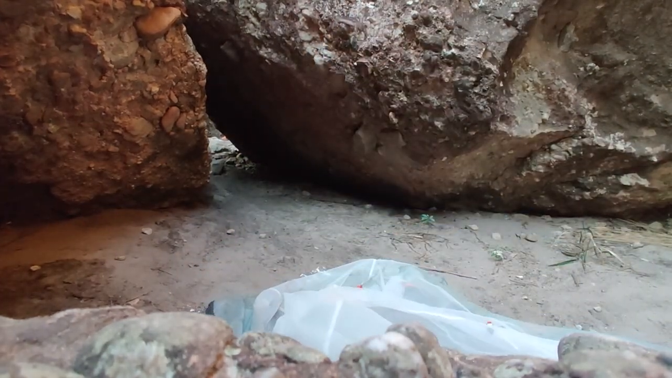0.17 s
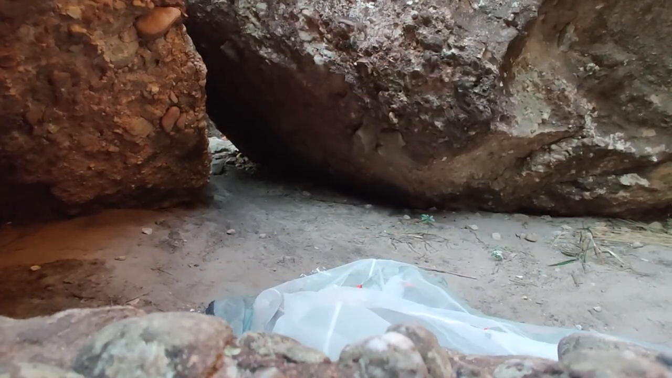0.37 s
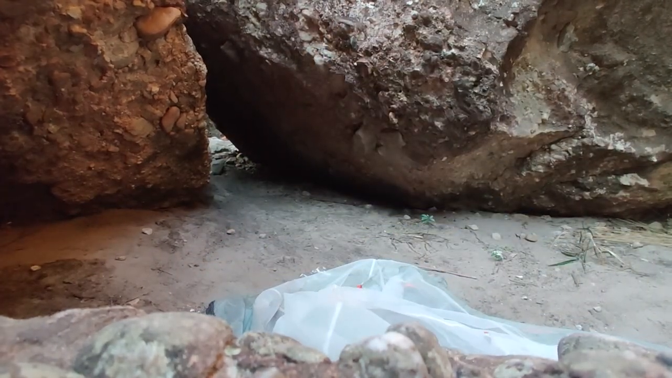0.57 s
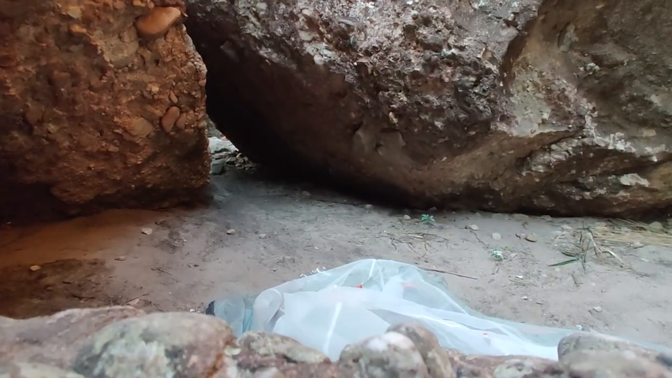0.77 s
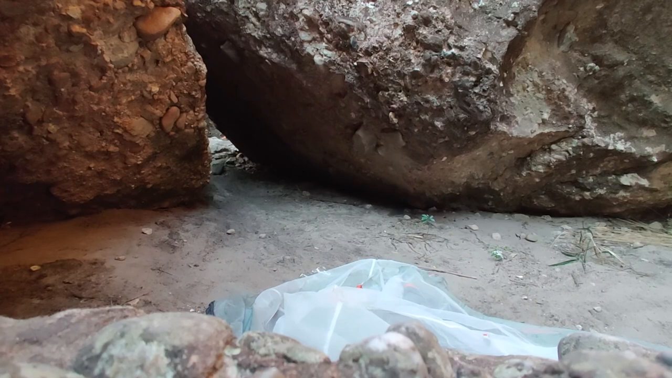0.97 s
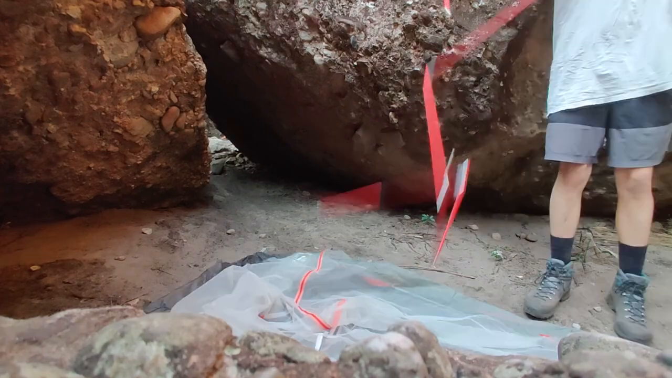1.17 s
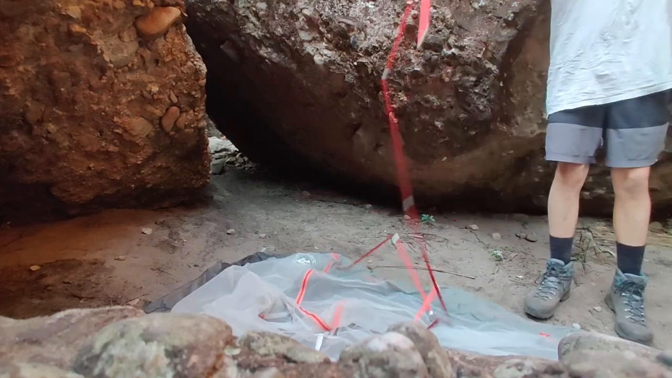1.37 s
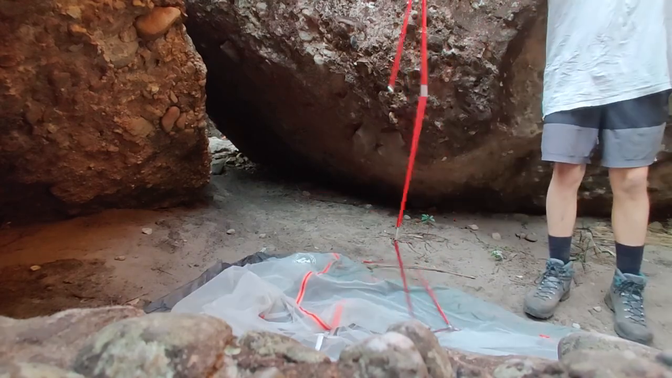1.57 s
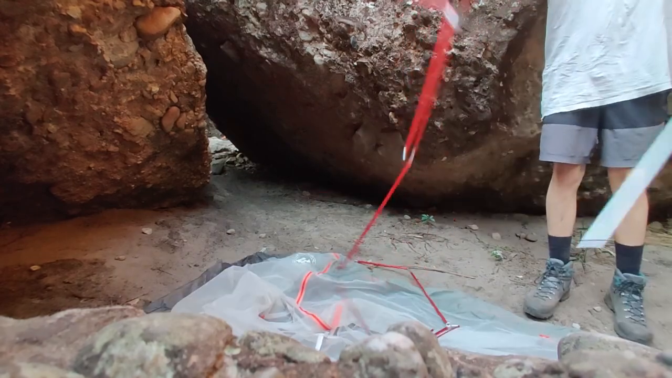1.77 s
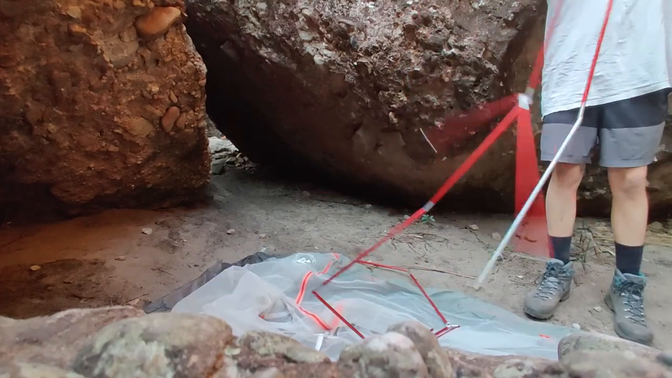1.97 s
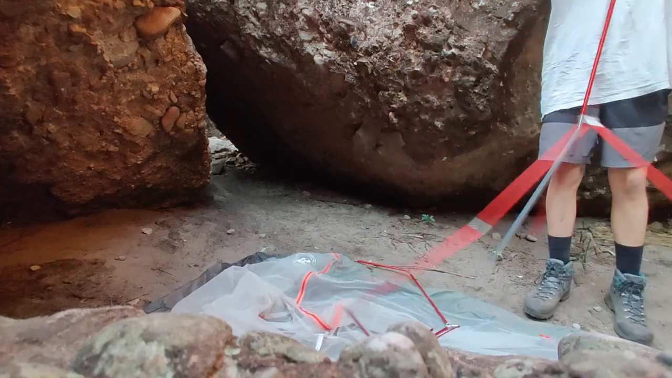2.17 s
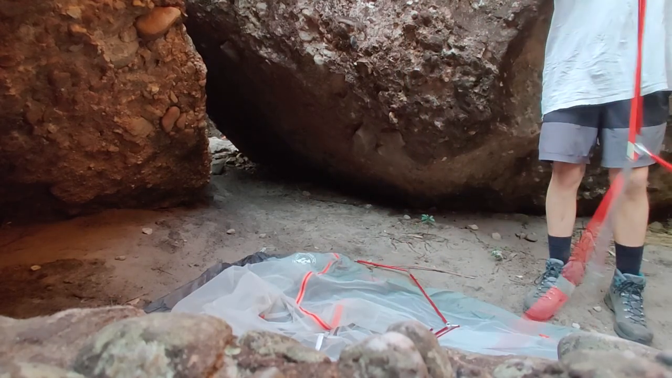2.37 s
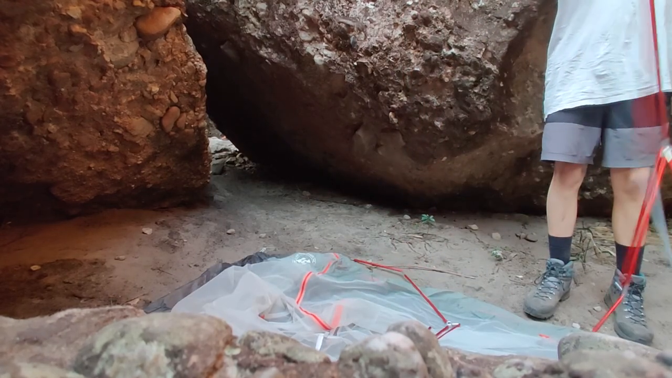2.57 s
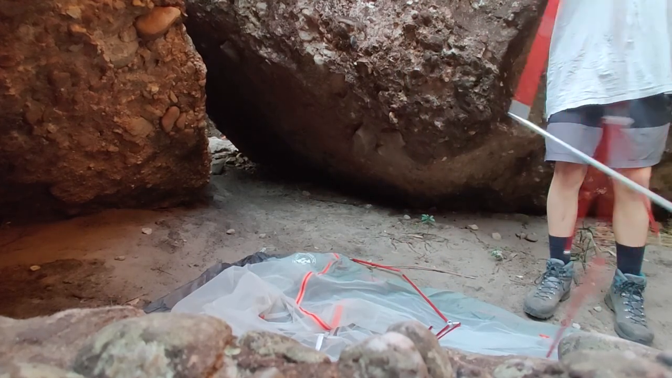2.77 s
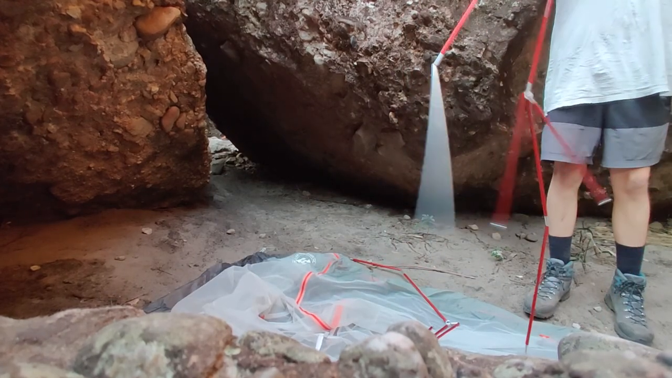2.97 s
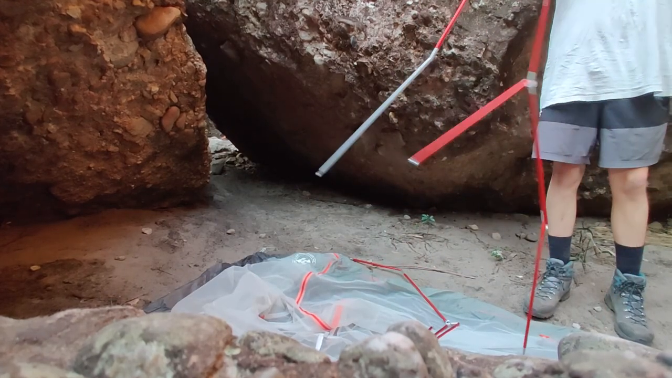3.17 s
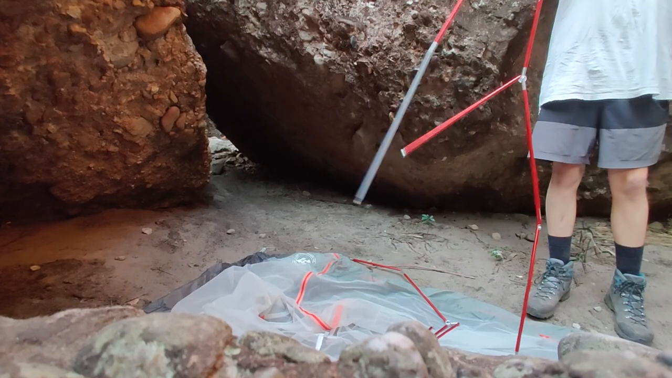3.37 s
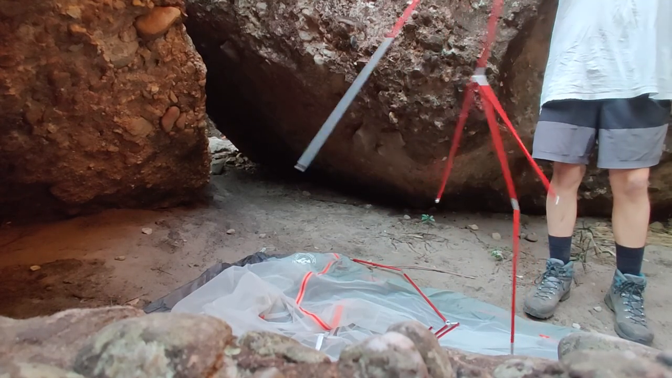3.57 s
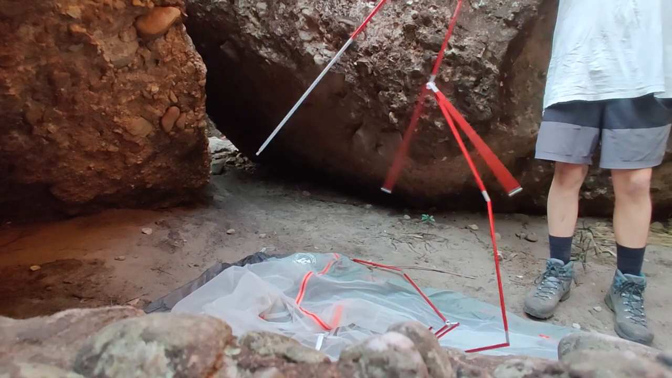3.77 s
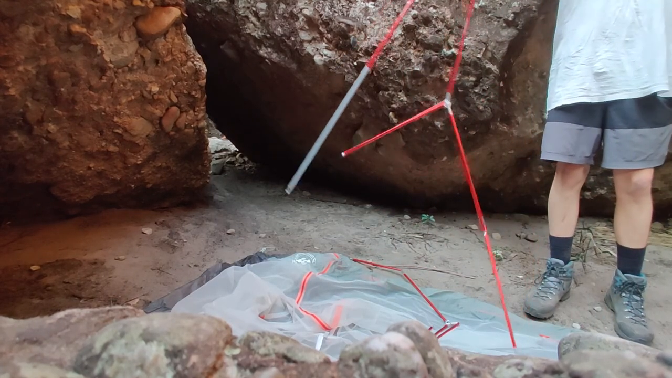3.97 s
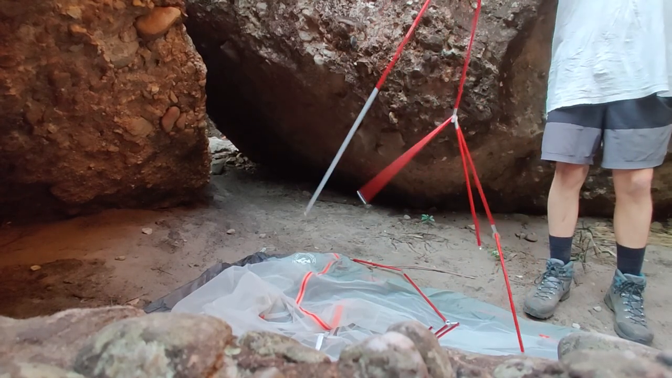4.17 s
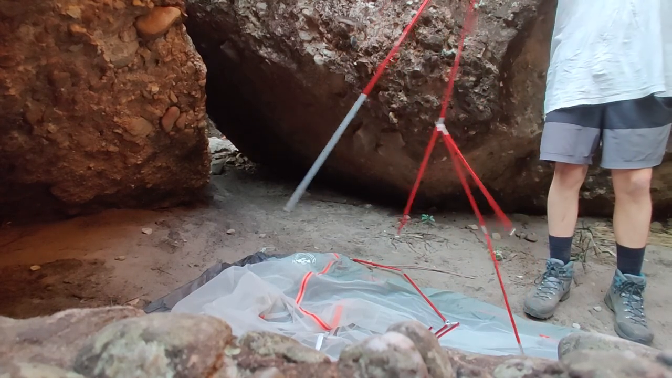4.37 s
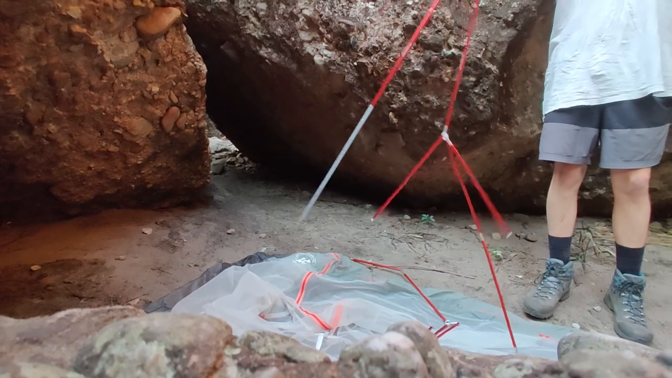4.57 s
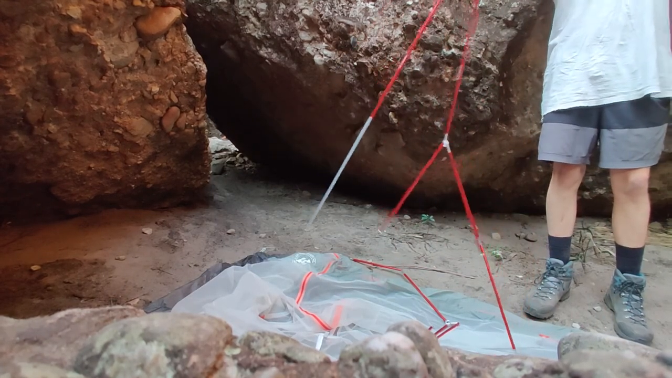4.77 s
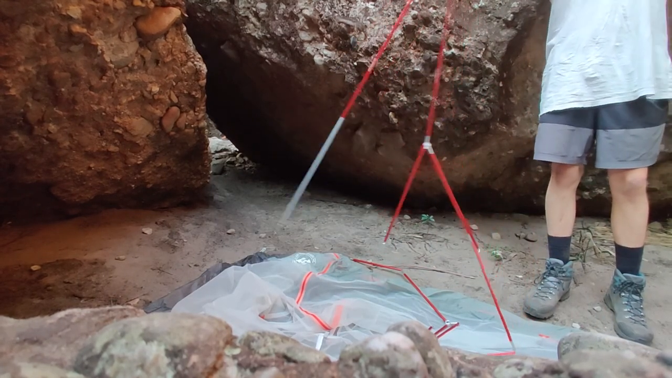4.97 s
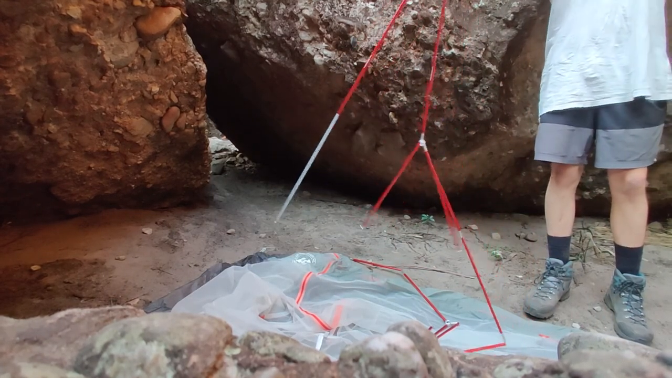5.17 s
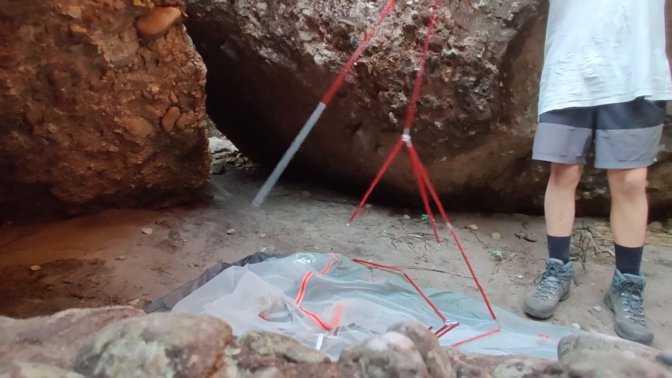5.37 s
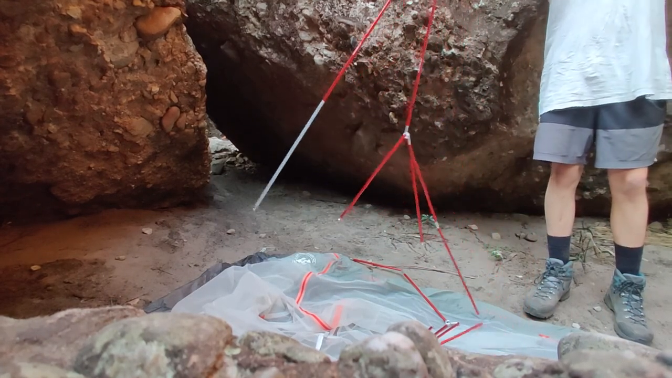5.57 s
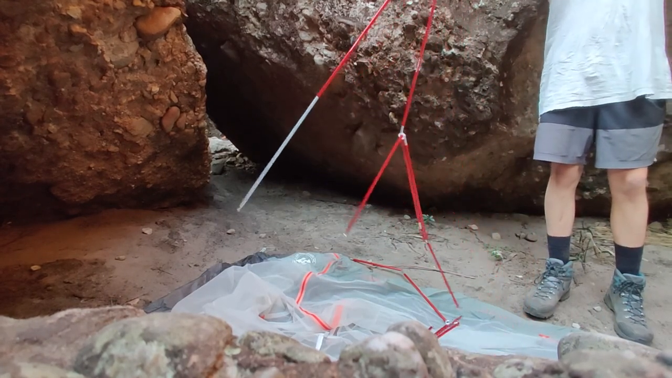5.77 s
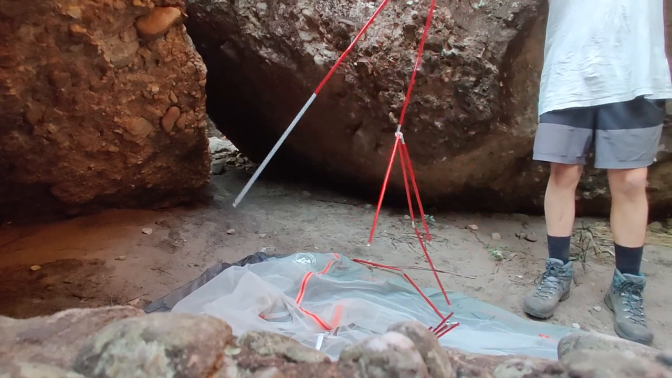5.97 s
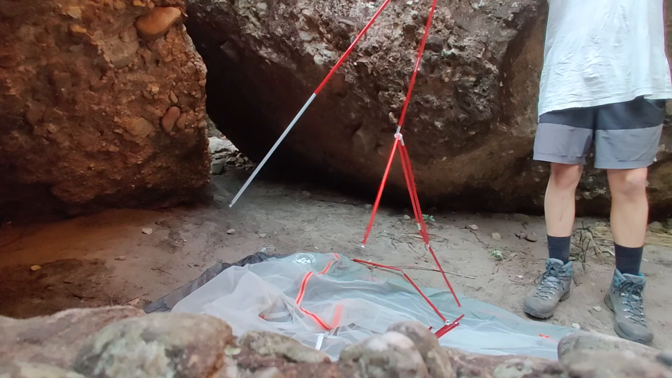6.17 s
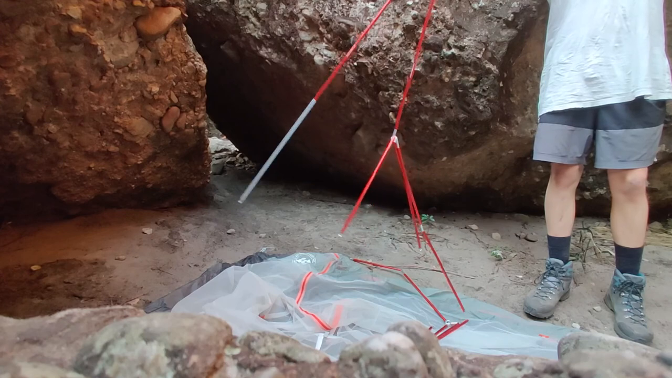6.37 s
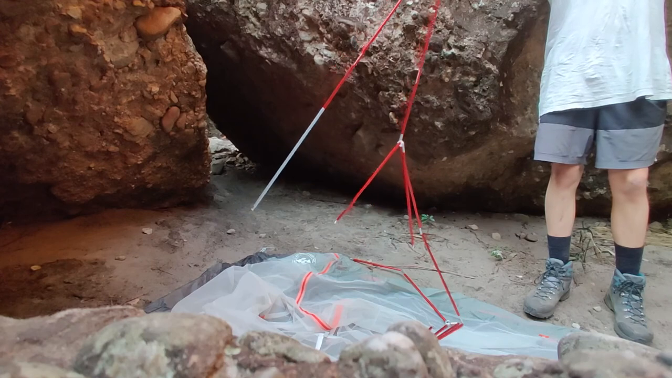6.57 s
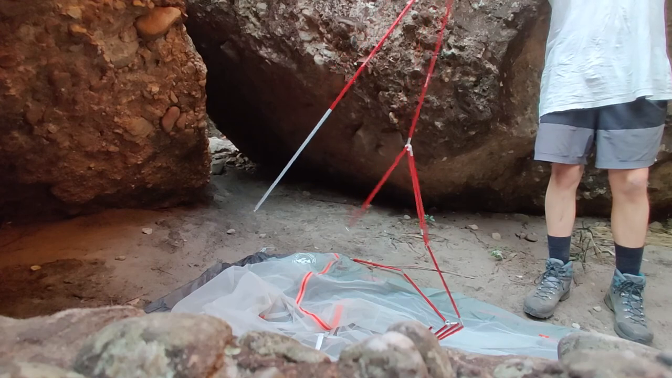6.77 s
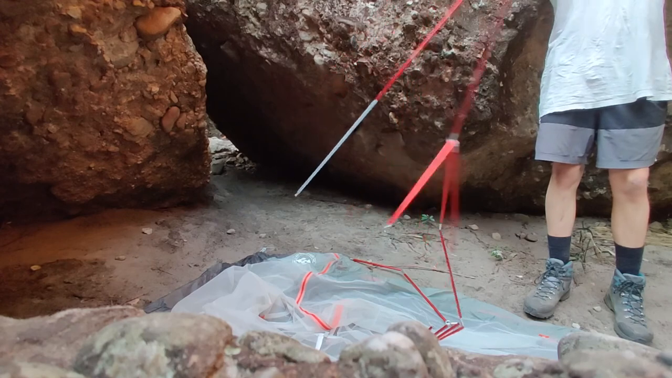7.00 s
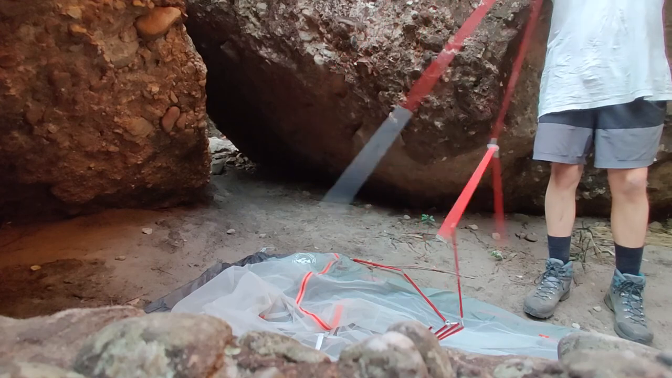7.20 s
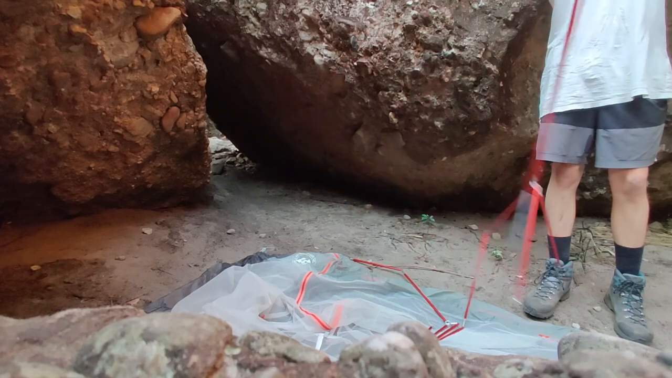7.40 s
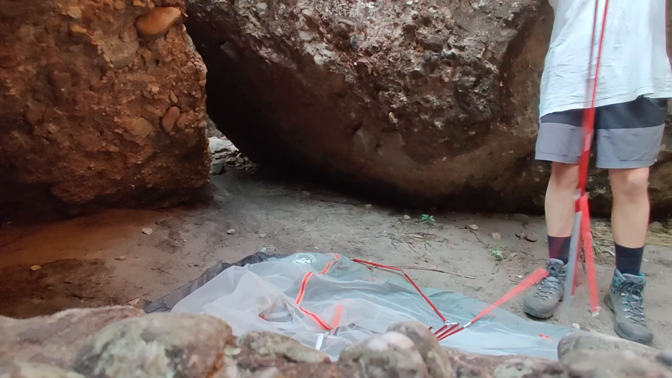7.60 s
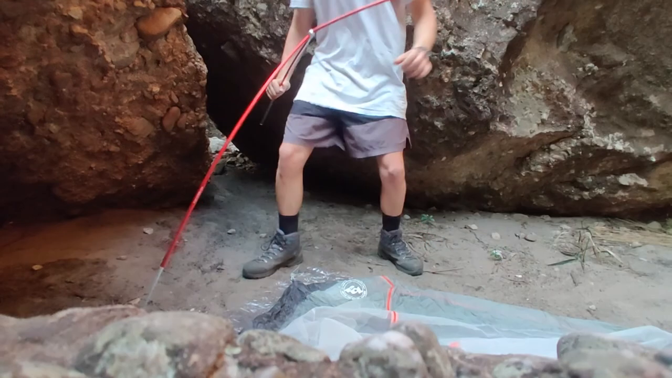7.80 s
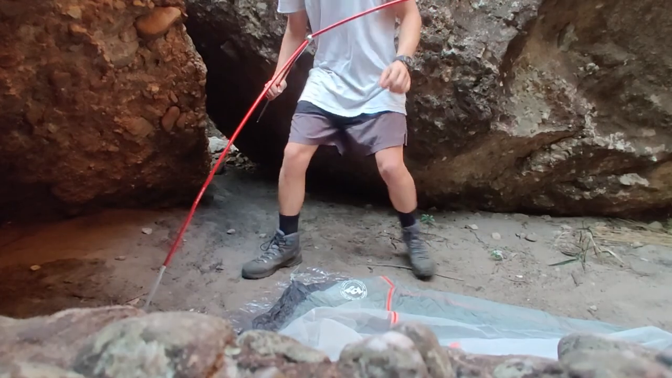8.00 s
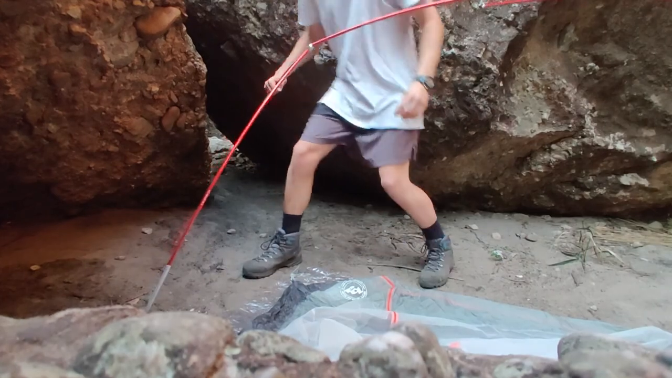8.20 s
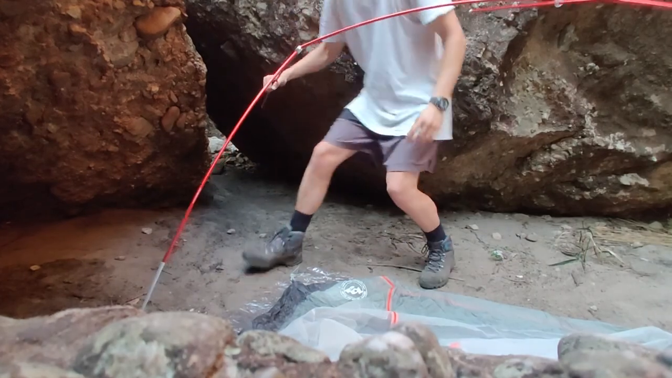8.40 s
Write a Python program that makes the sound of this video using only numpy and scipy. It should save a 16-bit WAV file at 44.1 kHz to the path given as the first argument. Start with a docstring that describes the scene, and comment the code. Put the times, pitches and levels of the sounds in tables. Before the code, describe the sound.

Hollow aluminium tent pole sections chatter and clack together in a rapid burst, then snap sporadically amid faint nylon rustle and a quiet scuff on sand.

```python
"""A shock-corded aluminium tent pole is shaken out under a rock overhang: chattering joints excite tube resonances.
A windy shot opens, with shaped noise and gusts rumbling at the microphones, then a cut to a quieter one.
Nylon rustles and flaps, and the cord sizzles, as noise under swelling, grainy envelopes; the rock adds a diffuse echo.
Short filtered scrapes follow, and shoes scuff on sand at the end with bass thuds and gritty noise."""
import sys
import numpy as np
from scipy import signal
from scipy.fft import rfft, irfft
from scipy.io import wavfile

SR = 44100
rng = np.random.default_rng(int(sys.argv[2]) if len(sys.argv) > 2 else 0)


def wrap_up_sound(samples):
    """Save the sound to the file named by the first command line argument, as 16-bit audio."""
    columns = np.atleast_2d(samples).T
    # keep every value between -1 and 1, then stretch to whole-number steps
    tamed = np.clip(columns, -1, 1)
    steps = np.round(tamed * 32767).astype(np.int16)
    wavfile.write(sys.argv[1], SR, steps)


N = 372204
TIME = np.arange(N) / SR


def amp(db):
    """Decibels to gain."""
    return 10 ** (np.asarray(db) / 20)


def read(points, hz):
    """Reads a curve of values over frequency, interpolated on a log-frequency axis."""
    f, value = np.transpose(points)
    return np.interp(np.log(hz + 1), np.log(np.abs(f) + 1), value)


def level(points):
    """Turns a curve of level over time into a gain for every sample."""
    return amp(np.interp(TIME, *np.transpose(points)))


def unit(x):
    """Scales a stereo sound to a mean energy of one a channel."""
    return x / np.sqrt(np.sum(x ** 2) / 2 + 1e-20)


def add(mix, s, sound):
    """Mixes a sound in at time s, in seconds."""
    part = mix[:, max(round(s * SR), 0):][:, :sound.shape[1]]
    part += sound[:, :part.shape[1]]


# Likeness of the two microphones in diffuse sound: f/Hz, left-right correlation [0 to 1]
LIKENESS = [(30, 0.17), (120, 0.98), (300, 0.6), (700, 0.25), (1500, 0.14), (15000, 0.063)]


def diffuse(size):
    """White noise from all around: the microphones agree most in the bass and little in the treble."""
    left, other = rfft(rng.standard_normal((2, size)))
    alike = np.clip(read(LIKENESS, np.fft.rfftfreq(size, 1 / SR)), -1, 1)
    right = alike * left + np.sqrt(1 - alike ** 2) * other
    return irfft(np.array([left, right]), size)


def noise(spectrum):
    """Steady coloured stereo noise of rms one."""
    gain = amp(read(spectrum, np.fft.rfftfreq(N, 1 / SR)))
    return np.sqrt(N) * unit(irfft(rfft(diffuse(N)) * gain, N))


def swells(rows):
    """Summed envelope of blows with exponential rise and fall: t/s, peak level/dB, rise/s, fall/s."""
    t = TIME[::16]
    shape = 0
    for s, db, rise, fall in rows:
        shape = shape + amp(db) * np.exp(-np.maximum((s - t) / rise, (t - s) / fall))
    return np.interp(TIME, t, shape)


def puffs(rows, spectrum):
    """Soft blows of coloured noise that swell and die without ringing."""
    return swells(rows) * noise(spectrum)


def grain(per_s, spread_db, fade):
    """Envelope of many small slips of uneven size, each decaying in power over fade seconds; rms one."""
    size = amp(2 * abs(spread_db) * np.minimum(rng.exponential(1, N), 3))
    slips = (rng.random(N) < per_s / SR) * size
    power = signal.lfilter([1], [1, -np.exp(-1 / (fade * SR))], slips)
    return np.sqrt(power / power.mean())


def bell(hz, centre, width):
    """Power response of one resonance, top one."""
    return 1 / (1 + (2 * (hz - centre) / width) ** 2)


def causal(db):
    """Minimum-phase response of a dB curve: nothing sounds before the blow."""
    cepstrum = irfft(np.log(amp(db)))
    half = cepstrum.shape[-1] // 2
    cepstrum[..., 1:half] *= 2
    cepstrum[..., half + 1:] = 0
    return np.exp(rfft(cepstrum))


def low_note(hz, db, t60, rise=0.0025):
    """One damped bass mode, alike at both microphones."""
    t = np.arange(SR // 2) / SR
    decay = amp(db - 60 * t / t60)
    return np.tile(decay * (1 - np.exp(-t / rise)) * np.sin(2 * np.pi * hz * t), (2, 1))


# Colour of still air: f/Hz, relative level/dB
AIR_COLOUR = [(12, -32), (20, 2), (130, -20), (158, -15), (233, -19.5), (292, -16.5), (355, -22),
              (408, -20), (510, -24.5), (603, -22.5), (1390, -31.5), (1690, -32.5), (8790, -38),
              (13400, -33), (15800, -36.5)]
# Colour of the breeze: f/Hz, relative level/dB
BREEZE_COLOUR = [(18, -36), (30, -16), (71, -5), (202, -6.5), (243, -9), (277, -6.5), (673, -12),
                 (728, -12), (1330, -21), (4190, -26), (7260, -30), (8500, -33), (15500, -32)]
# Colour of the wind buffeting the microphones: f/Hz, relative level/dB
BUFFET_COLOUR = [(15, -4), (50, -5), (75, -17), (130, -21.5), (250, -51), (600, -59), (2000, -81)]
# Gusts on the microphones, before the left-right balance: t/s, peak level/dB, rise/s, fall/s
WIND_GUSTS = [(.85, -28.5, 0.0092, 0.014), (.963, -21, 0.0098, 0.017), (1.035, -22.5, 0.013, 0.0051),
              (1.11, -43, 0.011, .01)]
AIR_DB, CUT_S = -61, 1.123
# Between gusts the buffeting builds steadily until the cut (dB before the left-right balance)
BUFFET_START_DB, BUFFET_DB_PER_S = -59.5, 13.5


def outdoors(breeze_db=-50):
    """Still air throughout; a breeze buffets the microphones in the windy shot, until the cut."""
    windy_shot = np.clip((CUT_S - TIME) / 0.008, 0, 1)
    build = amp(BUFFET_START_DB + BUFFET_DB_PER_S * np.minimum(TIME, CUT_S))
    balance = amp([[-11], [3]])  # left, right
    buffets = (build + swells(WIND_GUSTS)) * noise(BUFFET_COLOUR) * balance
    still_air = amp(AIR_DB) * noise(AIR_COLOUR)
    return still_air + windy_shot * (amp(breeze_db) * noise(BREEZE_COLOUR) + buffets)


# Steady rubbing of fabric as the camper works, before its grain: t/s, level/dB
RUBBING_LEVEL = [(0, -50), (.45, -58), (1.15, -58.5), (1.45, -50.5), (1.9, -51.5), (2.35, -57.5),
                 (2.6, -53.5), (2.8, -64), (3.45, -67), (3.8, -68), (5.4, -70), (6.55, -72), (7.17, -63.5),
                 (7.42, -72.5), (7.6, -63), (8.1, -68), (8.44, -59)]
# Colour of rubbing nylon: f/Hz, relative level/dB
NYLON_COLOUR = [(200, -4.5), (1500, -2.5), (3000, -1.5), (4800, 1), (7300, -1), (8500, -7.5), (10500, -1),
                (12500, -18.5), (16000, -4.5)]
# Brief swishes of nylon, before their grain: t/s, peak level/dB, rise/s, fall/s
NYLON_SWISHES = [(.58, -43.5, 0.061, 0.052)]
# Thin sizzle of the sliding cord: f/Hz, relative level/dB
CORD_COLOUR = [(9000, -29), (13800, -14), (14800, -3), (15500, -3.5), (16100, -17)]
# Pulls of the cord through the tubes, before grain and balance: t/s, peak level/dB, rise/s, fall/s
CORD_PULLS = [(2.6, -45.5, .04, 0.041), (3.18, -58.5, 0.019, .03), (3.535, -50, .018, .02),
              (4.98, -64.5, .05, .1), (7.03, -61, .12, .09)]
# A short rub starts just before each clack and fades after it (dB over the clack's table level)
RUB_LEAD_S, RUB_DB, RUB_RISE_S, RUB_FALL_S = 0.0081, -61, .014, 0.059
# The cord draws back at every clack (dB over the clack's table level)
RECOIL_DB, RECOIL_RISE_S, RECOIL_FALL_S = -69.5, .01, .09


def rubbing():
    """Nylon rustles and joints rub around each clack while the elastic cord slides in small slips."""
    joint_rubs = [(s - RUB_LEAD_S, db + RUB_DB, RUB_RISE_S, RUB_FALL_S) for s, db, *_ in POLE_CLACKS]
    recoils = [(s, db + RECOIL_DB, RECOIL_RISE_S, RECOIL_FALL_S) for s, db, *_ in POLE_CLACKS]
    rub_level = np.hypot(level(RUBBING_LEVEL), swells(NYLON_SWISHES + joint_rubs))
    rubs = rub_level * noise(NYLON_COLOUR) * grain(per_s=330, spread_db=1.0, fade=0.0086)
    cord = swells(CORD_PULLS + recoils) * noise(CORD_COLOUR) * grain(per_s=140, spread_db=6.5, fade=.008)
    return rubs + cord * amp([[-7], [2]])  # left, right


# Colour of the rock's late echo: f/Hz, relative level/dB
ROCK_COLOUR = [(200, -0.5), (1500, -0.5), (4000, -1), (7500, -6.5), (9000, -7), (15000, -18)]
# Decay of the rock's late echo: f/Hz, t60/s
ROCK_DECAY = [(200, 0.62), (2000, .48), (7000, 0.42), (15000, 0.4)]


def rock(x, wet_db=-21, build=0.008, wall=0.084, wall_db=-3):
    """A faint diffuse tail from the boulders, with one soft slap from a farther wall."""
    hz, t, z = signal.stft(diffuse(size=32768), SR, nperseg=256)
    slap = amp(wall_db) * np.exp(-((t - wall) / 0.027) ** 2)
    swell = 1 - np.exp(-(t / build) ** 2) + slap
    decay_db = -60 * t / read(ROCK_DECAY, hz)[:, None]
    z = z * swell * amp(read(ROCK_COLOUR, hz)[:, None] + decay_db)
    echo = unit(signal.istft(z, SR, nperseg=256)[1])
    return amp(wet_db) * signal.fftconvolve(x, echo, axes=1)[:, :N]


# Colour of a clack at the left microphone: f/Hz, relative level/dB
LEFT_COLOUR = [(90, -27), (220, -16.5), (1200, -16), (2300, -12), (3300, -5), (4900, -2), (6000, -8.5),
               (8400, -6.5), (9700, 2), (11300, -6.5), (12500, -21), (14300, -14.5), (15500, -8),
               (16200, -27.5)]
# Colour of a clack at the right microphone: f/Hz, relative level/dB
RIGHT_COLOUR = [(90, -33.5), (220, -21.5), (1200, -16.5), (2800, -7.5), (4400, -2.5), (6800, 1), (7700, -2),
                (8500, -7.5), (10800, -10.5), (11700, -3.5), (12600, -12), (13900, -2), (15500, 3),
                (16200, -17.5)]
# Ringing of the tubes: f/Hz, level/dB before weighting by ring length, t60/s
TUBE_MODES = [(4780, -23, 0.055), (7350, -11.5, 0.016), (9570, -13.5, 0.004), (13240, -12, 0.023),
              (14450, -19, .04)]
# Hollow bending notes of a section: share of its ring frequency [ratio], level/dB
HOLLOW_MODES = [(.39, -1.5), (.28, 4), (0.21, 0), (.11, 6)]
HOLLOW_SPREAD_OCT = 0.098  # pitch scatter from blow to blow
PAN_DB, PAN_SPREAD_DB = 0.9, 1.4  # left over right, and its scatter as the sections swing


def clack(db, knock_db, bright_db, top_db, crack_db, ring_hz, hollow_q=22, lumpy_db=2.5, chatter=0.0013,
          scatter_t60=0.097, ground=.007, ground_db=-7, spread=0.014, ring_db=8, ring_width=290,
          lag_count=6, size=8192):
    """A joint chatters for an instant and the tubes ring; ground and nearby stones scatter the crack."""
    t, hz = np.arange(size) / SR, np.fft.rfftfreq(size, 1 / SR)
    side = rng.standard_normal()  # where the section has swung to
    contact = rng.standard_normal(size) * (t / chatter) ** .6 * np.exp(-(t / chatter) ** 1.5)
    left_lag = max(round(lag_count - 2 * side), 0)  # samples: the pole is nearer the right microphone
    crack = unit(np.array([np.roll(contact, left_lag), contact]))

    # Single stones stand out early; later echoes merge and die evenly
    lumps = np.interp(t, np.linspace(0, t[-1], size // 48), rng.uniform(-2, 2, size // 48))
    scatter_db = lumpy_db * lumps * np.exp(-t / .02) - 60 * t / scatter_t60
    scatter = unit(diffuse(size) * (1 - np.exp(-(t / 0.0032) ** 2)) * amp(scatter_db))
    bounce = np.roll(crack, round(ground * rng.uniform(.6, 1.3) * SR), axis=1)
    blow = crack * amp(crack_db) + unit(scatter + amp(ground_db) * bounce)

    body = 1 + amp(ring_db) ** 2 * bell(hz, ring_hz, ring_width)
    for share, mode_db in HOLLOW_MODES:
        f = ring_hz * share * 2 ** (HOLLOW_SPREAD_OCT * rng.standard_normal())
        body = body + amp(mode_db) ** 2 * bell(hz, f, f / hollow_q)
    for f, mode_db, t60 in TUBE_MODES:  # pitch varies a little by blow; a longer ring stands higher
        width = np.log(1000) / (np.pi * t60)
        pitch = f * (1 + spread * rng.standard_normal())
        body = body + amp(mode_db) ** 2 * 4000 / width * bell(hz, pitch, width)

    pan_db = PAN_DB + PAN_SPREAD_DB * side
    microphones_db = np.array([read(LEFT_COLOUR, hz) + pan_db / 2, read(RIGHT_COLOUR, hz) - pan_db / 2])
    sound = unit(irfft(rfft(blow) * causal(microphones_db + 10 * np.log10(body))))
    touch_db = np.interp(hz, [1100, 3500, 7700, 9000, 12300, 13800],
                         [knock_db, 0, 0, bright_db, bright_db, top_db])
    return amp(db) * irfft(rfft(sound) * causal(touch_db))


# One row a clack, before the pole gain: t/s, level/dB, low knock level/dB, brightness level/dB,
# top ring level/dB, first crack level over its scatter/dB, ring of the struck section f/Hz
POLE_CLACKS = [(1.178, -22.5, 2, -8.5, -16, -8, 4680), (1.254, -21, 0, -1, -6.5, -0.5, 5460),
               (1.2965, -6.5, 7, -2, -4, -8.5, 5600), (1.3656, 5.5, 9.5, -2.5, -2.5, -5, 6420),
               (1.377, 2.5, 5.5, -3, -3.5, 4, 6200), (1.476, -5, -4.5, -5, -9, 4.5, 6500),
               (1.498, 12.5, -1, -3.5, -6.5, -5, 7080), (1.566, -10.5, 4.5, -9.5, -8, -1, 2750),
               (1.6367, 1.5, 3, 3.5, 2.5, -5.5, 6950), (1.738, 5.5, -6, 3.5, -.5, 2, 7860),
               (1.804, -13.5, 9, -4, -6.5, -9, 5140), (1.876, 5, -1.5, -2.5, -3, -8, 5200),
               (1.906, 4.5, 0, -1, -5, -2, 6000), (1.9378, -1.5, -5, -3.5, -2, 4, 6700),
               (1.976, 3.5, -6, .5, 2, 4.5, 7500), (2.0993, 8.5, -6, 1.5, 1.5, 0, 7500),
               (2.2394, 3.5, 1, -2, -0.5, -6, 4820), (2.3083, -8, -3.5, -15, -8, -4, 4430),
               (2.319, -15, 1, -11, -2, 2, 4300), (2.3846, 3, -7.5, -6, -4, -2.5, 4650),
               (2.518, -7, -13, -8, -8, 2, 6500), (2.548, 0.5, -6.5, -9, -9, 1.5, 7620),
               (2.6217, -8.5, -1.5, -4.5, -2, -2.5, 8100), (2.752, -24, 7.5, -12, -14, -4, 3330),
               (2.9082, -16.5, 11, -9, -10, -11.5, 2340), (2.952, -25, -5, -7, -6, 5, 5400),
               (3.12, -2, -0.5, -2.5, 6.5, 0, 7860), (3.175, -17, 2.5, -4, 2, -6.5, 5200),
               (3.267, -20.5, -8.5, -9.5, -17, 2, 4820), (3.293, -11, -2.5, -4, -4, -5, 5070),
               (3.326, -10.5, 0.5, -5, -1.5, -7.5, 6960), (3.3833, -3, 12, 3.5, 12.5, -12.5, 7200),
               (3.393, 8, -9.5, -5, -10.5, -1, 7600), (3.4477, -10.5, 1.5, -6, -12, -6.5, 7660),
               (3.5671, 6.5, 1, 2.5, 9, 0.5, 7300), (3.884, -14, 2, -5, -4, -4.5, 5370),
               (3.9802, -1.5, -4, -12.5, 5, 1.5, 5500), (4.001, -9, 1, -3.5, 4, -4, 4780),
               (4.0432, -13, 2.5, -3.5, 5.5, -4.5, 4520), (4.2309, -3.5, -1.5, -5, -3.5, -2, 5920),
               (4.5082, -23.5, 5, -1, 2, -4, 4900), (4.6409, 9, -11.5, -2, -2, 4, 6780),
               (4.7439, -5.5, -1.5, 2, 8, -7, 5950), (5.085, 3, 0.5, -3, 1.5, -5.5, 7470),
               (5.225, -11, 1, -6.5, -1, -4, 3100), (6.06, -9.5, 2.5, -11.5, -9, 0.5, 6970),
               (6.724, -9, -10.5, -3.5, -9.5, 7, 7470), (6.7407, 5, -0.5, 2.5, 0, 2, 7480),
               (7.398, -15.5, 6.5, -6, -14, -3, 3580), (7.507, -0.5, -7, -4.5, -0.5, -5, 6230)]
# Snaps that set the whole pole bending, before the pole gain: t/s, f/Hz, level/dB
POLE_BENDS = [(1.499, 266, -52), (1.638, 200, -51), (1.74, 200, -56), (2.241, 292, -56),
              (2.387, 253, -54.5), (3.123, 208, -58), (3.569, 273, -56), (4.232, 216, -58.5),
              (4.642, 176, -58), (5.087, 203, -51)]


def poles(gain_db=2.5):
    """Sections knock and snap together, and some snaps set the whole pole bending with a low note."""
    out = np.zeros((2, N))
    for s, *blow in POLE_CLACKS:
        add(out, s, clack(*blow))
    for s, hz, db in POLE_BENDS:
        add(out, s, low_note(hz, db, t60=0.26))
    return amp(gain_db) * out


# Fabric flaps as the pole is whipped out: t/s, peak level/dB, rise/s, fall/s
FABRIC_FLAPS = [(1.337, -40, 0.011, 0.027), (1.369, -26, 0.014, 0.0092)]
# Colour of a flap: f/Hz, relative level/dB
FLAP_COLOUR = [(25, 2), (80, 4), (170, 1), (350, 6), (900, 2.5), (1800, -0.5), (4000, -4.5), (9000, -10),
               (16000, -19.5)]


def flaps():
    """Tent fabric beats the air in soft puffs of noise."""
    return puffs(FABRIC_FLAPS, FLAP_COLOUR)


# Span in which loose sections tick while the pole is shaken: start t/s, end t/s
TICK_SPAN = (1.78, 2.5)
TICK_DB, TICK_SPREAD_DB = 41.5, 1.5  # strength over the rubbing level, and its scatter
TICK_BRIGHT_DB, TICK_HZ = -10.5, 5200  # brightness, and central ring frequency


def ticks(count=5):
    """Loose sections touch at random, harder when the camper works harder."""
    out = np.zeros((2, N))
    for k, (when, size, pitch) in enumerate(2 * rng.random((count, 3)) - 1):
        s = np.interp(k + .5 + when / 2, [0, count], TICK_SPAN)
        db = np.interp(s, *np.transpose(RUBBING_LEVEL)) + TICK_DB + TICK_SPREAD_DB * size
        ring_hz = TICK_HZ * 2 ** (pitch / 2)  # up to half an octave either way
        add(out, s, clack(db, 0, TICK_BRIGHT_DB, TICK_BRIGHT_DB, 0, ring_hz))
    return out


# Short scrapes of metal, cloth, soles and grit: t/s, centre f/Hz, width/Hz, level/dB, fall/s
SHORT_SCRAPES = [(3.115, 5130, 900, -37, 0.009), (4.147, 4880, 1100, -63, 0.022),
                 (4.613, 5600, 351, -47.5, 0.041), (5.705, 4480, 1406, -63.5, .04),
                 (6.698, 5000, 1500, -58, .025), (7.083, 6000, 3500, -53.5, 0.0086),
                 (7.18, 6500, 3000, -57, 0.014), (7.786, 3300, 2400, -57, .03),
                 (7.891, 7800, 4500, -50.5, 0.015), (8.2, 163, 70, -51, 0.025),
                 (8.389, 8500, 4500, -50, 0.01)]


def scrapes(rise=0.0026):
    """Brief friction: noise through one resonance, each scrape in a band of its own."""
    out, size = np.zeros((2, N)), 16384
    t, hz = np.arange(size) / SR, np.fft.rfftfreq(size, 1 / SR)
    for s, centre, width, db, fall in SHORT_SCRAPES:
        hiss = np.sqrt(size) * unit(irfft(rfft(diffuse(size)) * bell(hz, centre, width)))
        envelope = np.minimum(t / rise, 1) * np.exp(-t / fall)
        add(out, s - rise, amp(db) * hiss * envelope)
    return out


# Shoes on sand: t/s, peak level/dB of the pushed sand, rise/s, fall/s
SHOE_STEPS = [(7.817, -46.5, 0.0073, 0.031), (7.889, -57.5, 0.01, 0.089), (8.2, -59, 0.014, 0.13)]
# Colour of pushed sand: f/Hz, relative level/dB
SAND_COLOUR = [(25, -3), (60, 2.5), (130, -12), (300, -11), (1200, -18), (2500, -25), (8000, -33),
               (16000, -47)]
# Colour of crunching grit: f/Hz, relative level/dB
GRIT_COLOUR = [(300, -10), (1200, 0), (3000, -7), (6000, -15), (15000, -25)]


def shoes(thud_hz=56, thud_db=6, grit_db=-10):
    """Each step thuds into the ground, pushes sand aside and crunches a few grains."""
    sand = puffs(SHOE_STEPS, SAND_COLOUR)
    grit = puffs(SHOE_STEPS, GRIT_COLOUR) * grain(per_s=90, spread_db=9.0, fade=0.0043)
    out = sand + amp(grit_db) * grit
    for s, db, rise, fall in SHOE_STEPS:
        add(out, s - rise, low_note(thud_hz, db + thud_db, t60=fall * np.log(1000)))
    return out


def scene():
    """Pole, fabric and shoes echo from the rock, over the outdoor air."""
    near = poles() + ticks() + flaps() + shoes() + rubbing() + scrapes()
    return near + rock(near) + outdoors()


EDGE_HZ = 16350  # upper band edge


def record(dry):
    """Clips at full scale, then removes the treble above the band edge."""
    low_pass = signal.firwin(255, EDGE_HZ, window=("kaiser", 8), fs=SR)
    return signal.oaconvolve(np.clip(dry, -1, 1), low_pass[None], "same")


dry = scene()
out = record(dry)
wrap_up_sound(out)
```